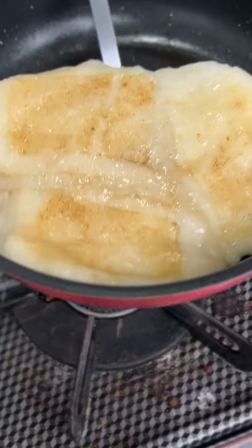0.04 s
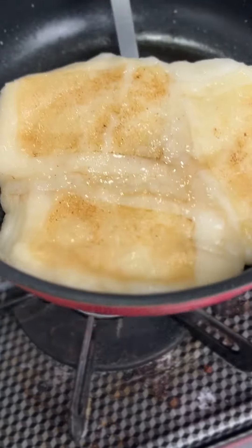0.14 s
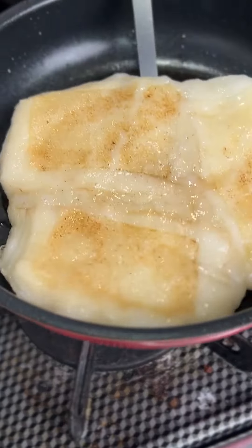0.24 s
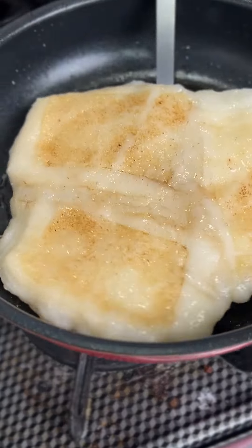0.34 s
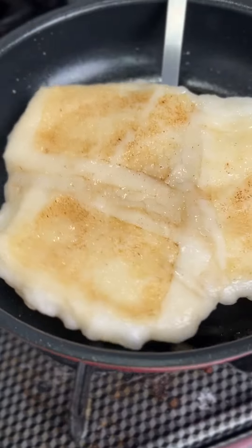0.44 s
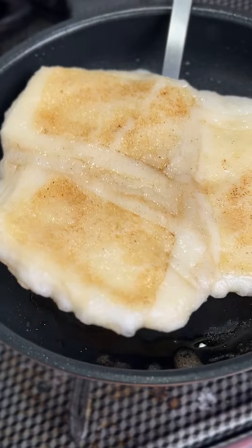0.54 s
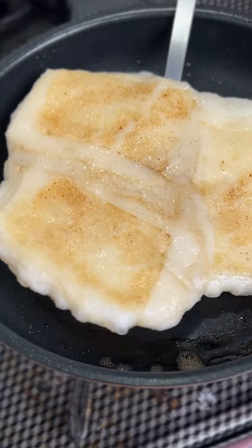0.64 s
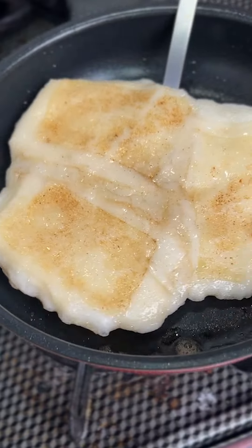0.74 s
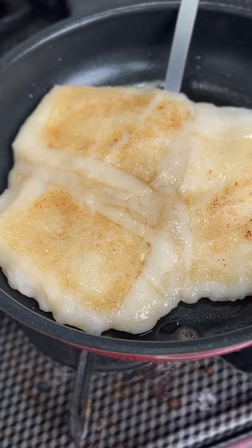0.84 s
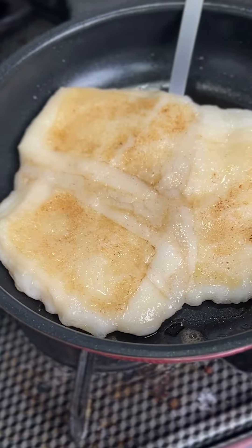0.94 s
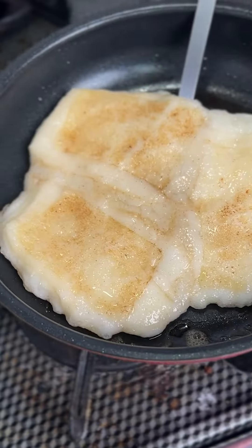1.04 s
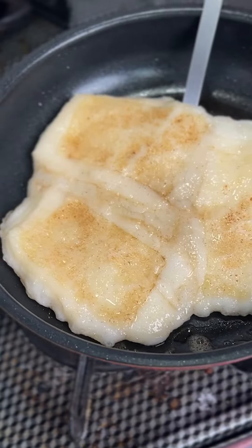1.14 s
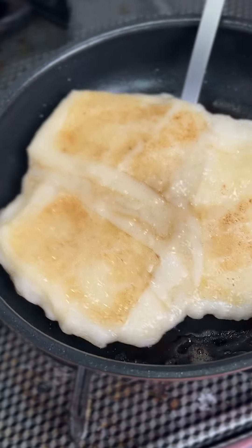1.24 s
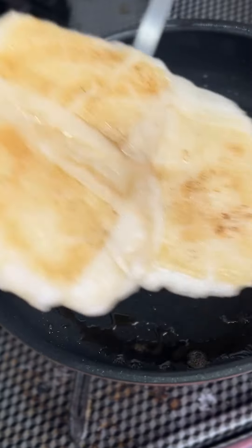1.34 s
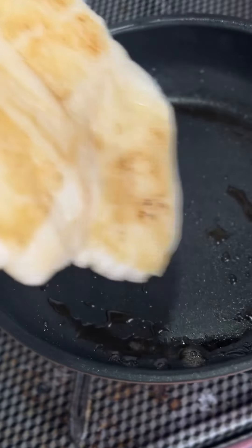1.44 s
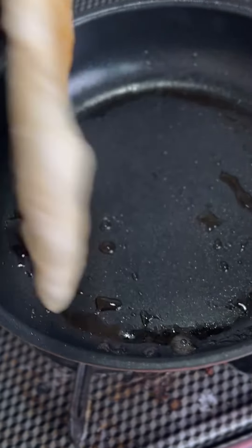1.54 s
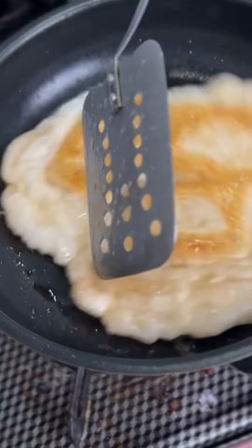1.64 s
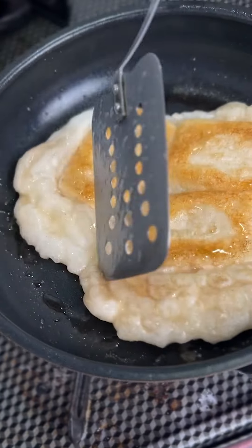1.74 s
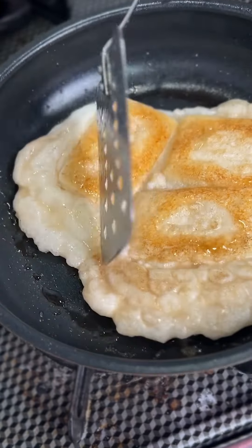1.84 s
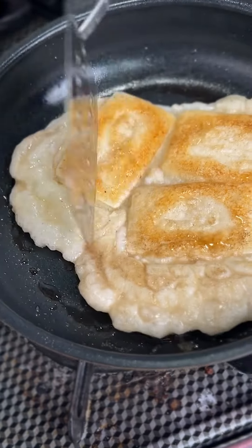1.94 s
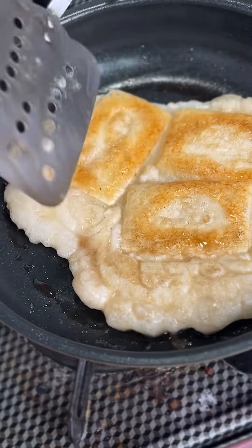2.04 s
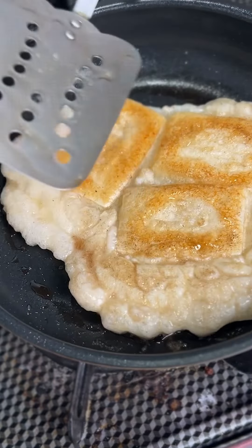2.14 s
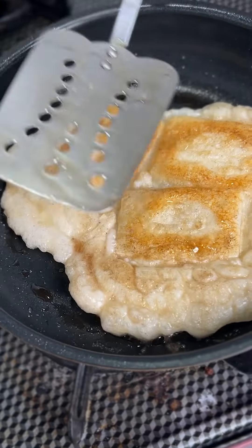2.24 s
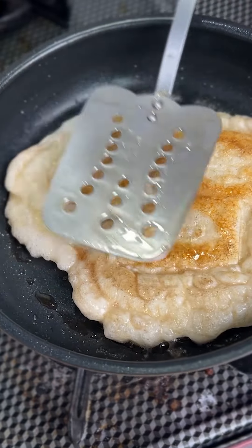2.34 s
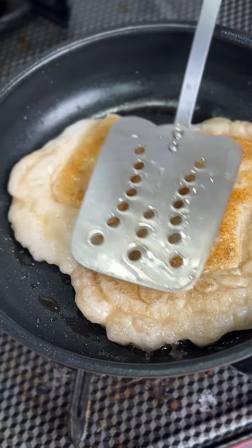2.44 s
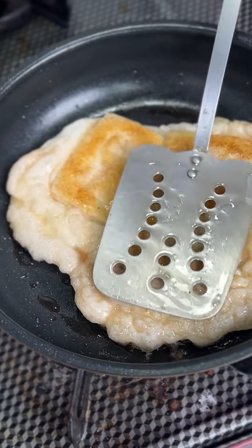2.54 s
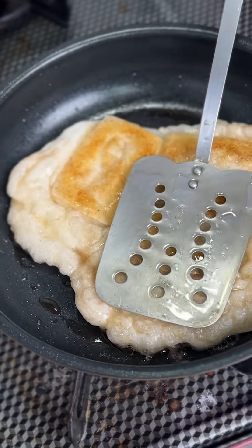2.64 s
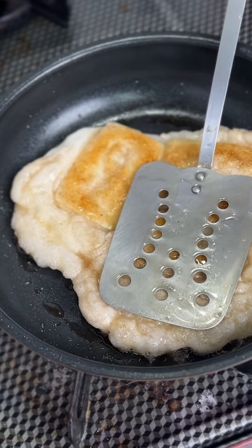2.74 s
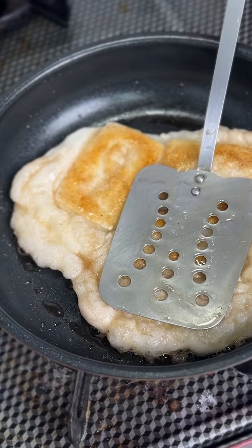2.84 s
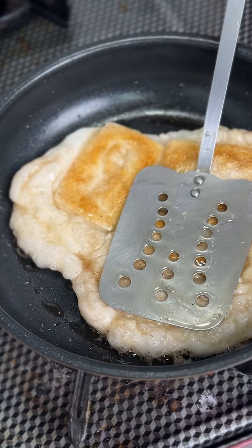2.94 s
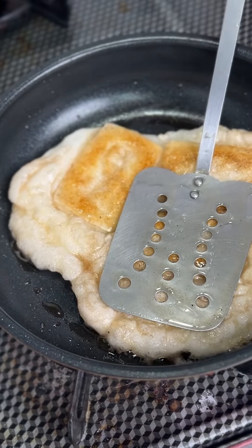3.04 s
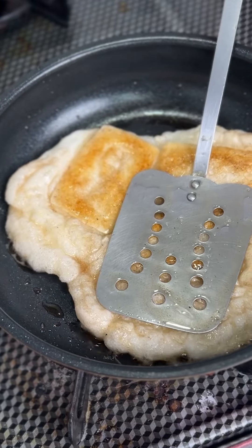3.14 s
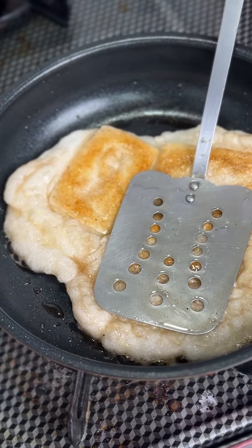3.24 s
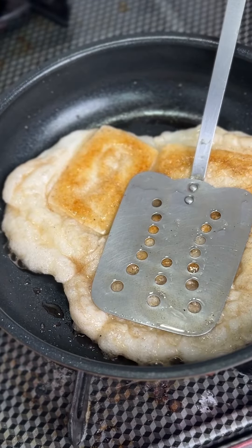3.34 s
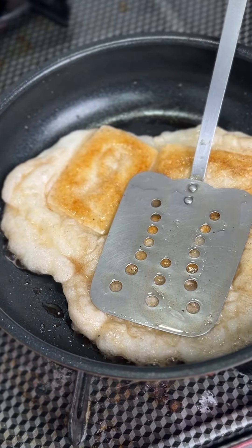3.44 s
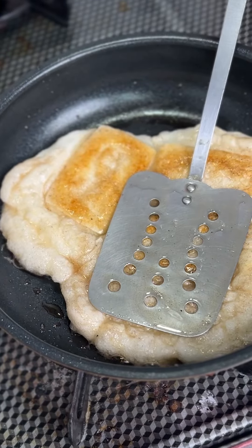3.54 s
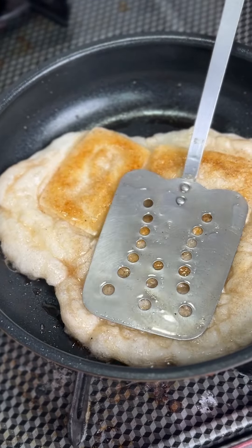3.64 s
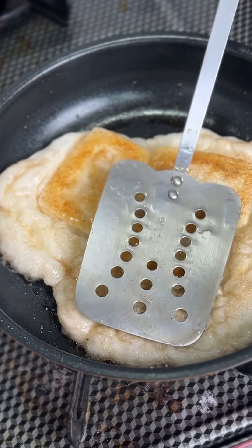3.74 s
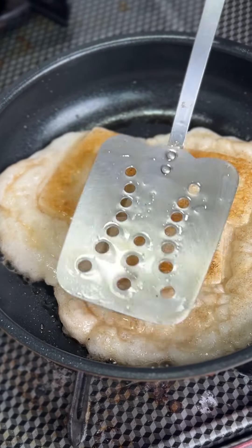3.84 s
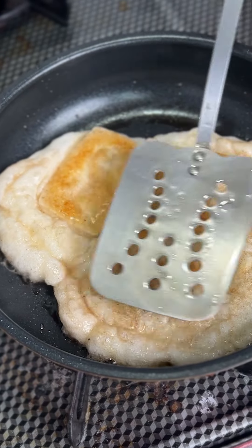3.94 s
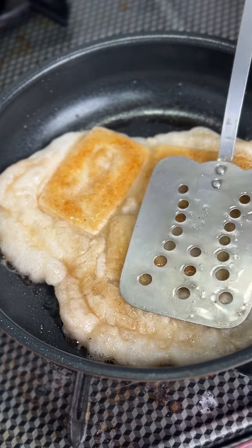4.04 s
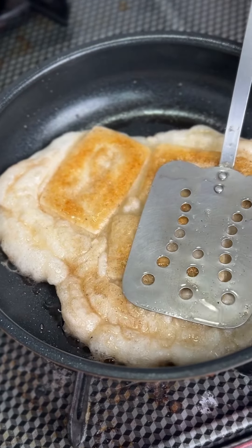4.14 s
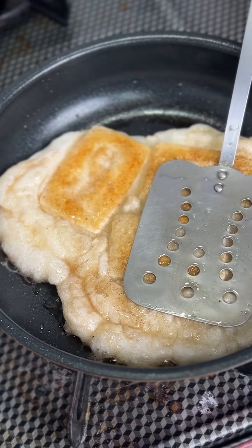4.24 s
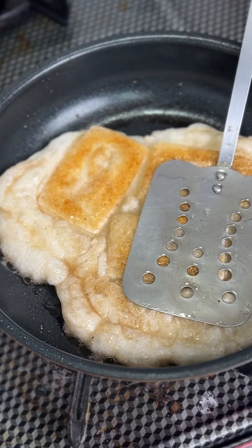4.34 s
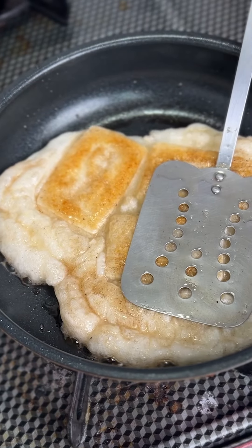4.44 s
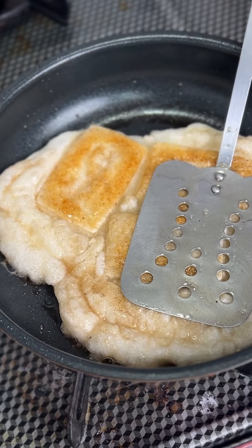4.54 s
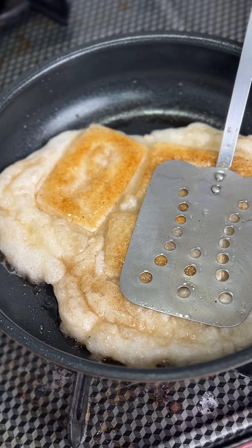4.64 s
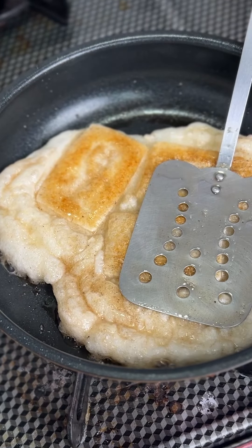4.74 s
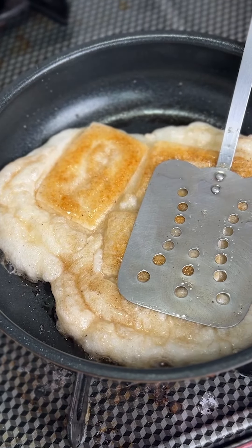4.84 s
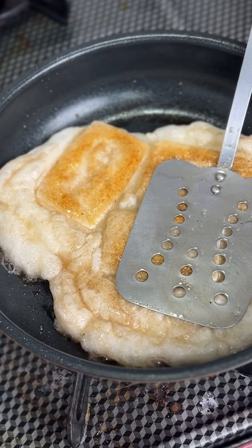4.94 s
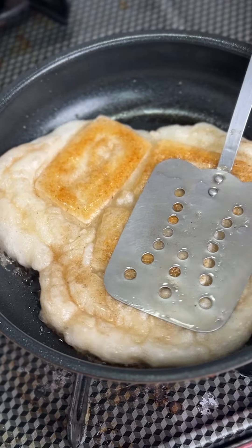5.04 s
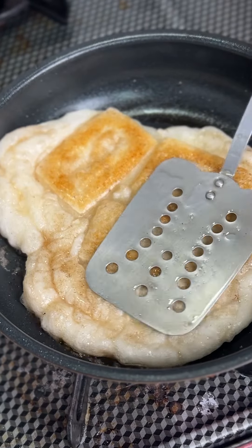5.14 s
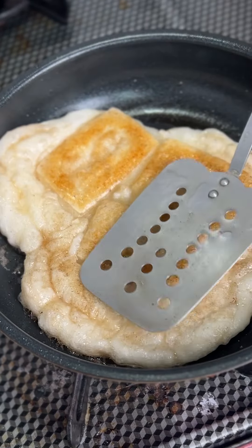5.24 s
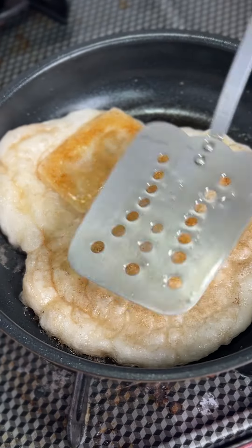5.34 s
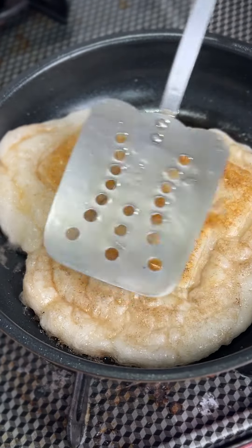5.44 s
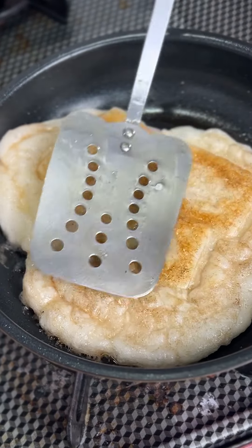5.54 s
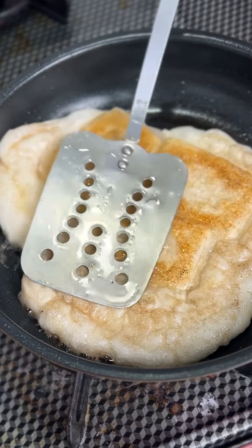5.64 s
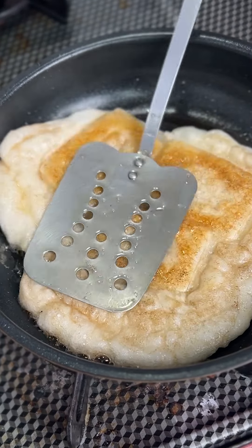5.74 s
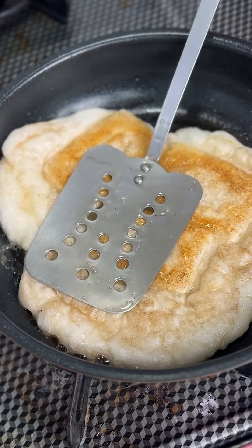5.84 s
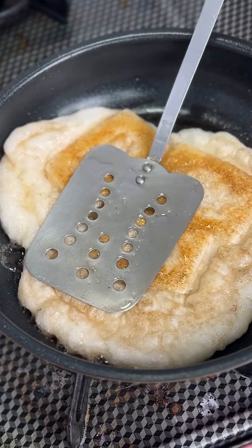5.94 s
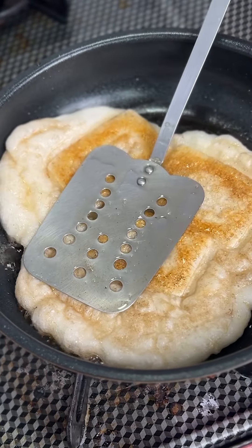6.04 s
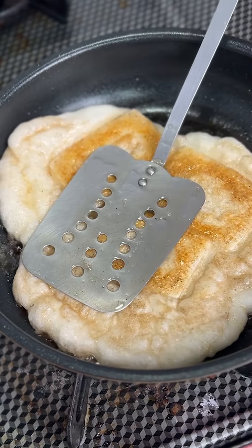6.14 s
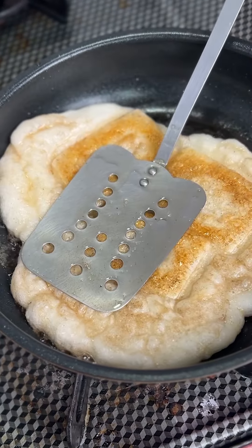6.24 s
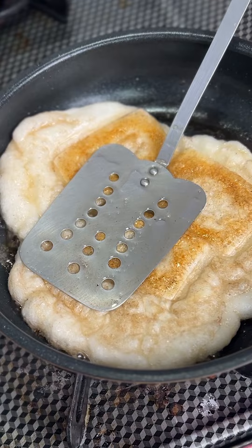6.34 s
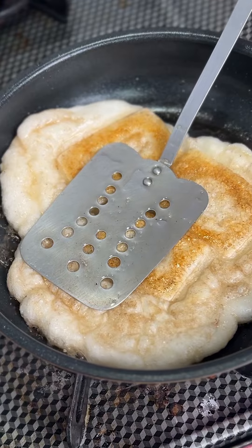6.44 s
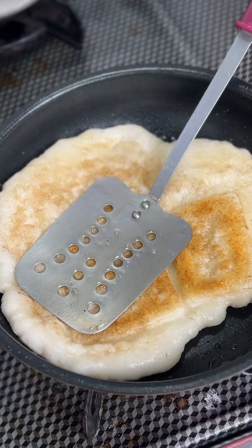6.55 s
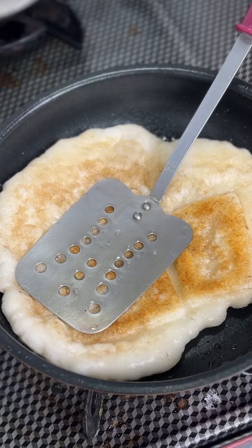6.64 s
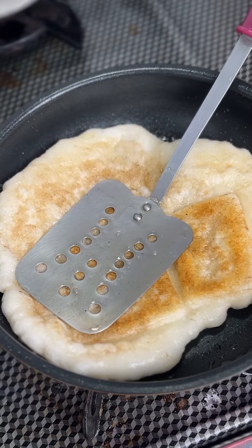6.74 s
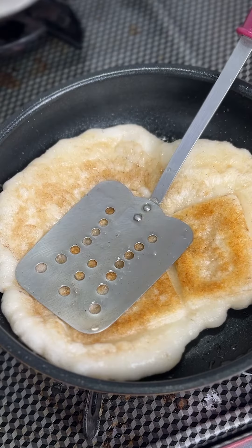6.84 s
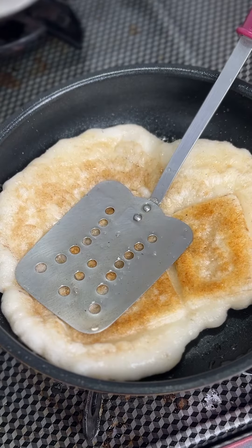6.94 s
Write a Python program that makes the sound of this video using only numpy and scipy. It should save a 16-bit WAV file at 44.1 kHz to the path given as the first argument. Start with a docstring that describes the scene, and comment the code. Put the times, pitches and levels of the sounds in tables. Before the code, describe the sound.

A metal spatula scrapes a pan, rice cakes flip over with a wet knock, then butter sizzles and snaps as the blade pats and presses.

```python
"""Rice cakes fry in butter in a nonstick pan on a gas ring, close to a phone in a small kitchen.
First the browned side fries nearly dry (sparse clicks through filters) and a slotted steel spatula scrapes (slips
ring blade modes). At 1.69 s the cakes land on their fresh side with a knock (noise and pan modes); the sizzle jumps.
From 2.2 s the blade pats and presses: fizz swells, butter, dough and blade taps snap (noise cracks, short rings).
Squeaks (gliding sines) come throughout, over the steady gas ring (filtered noise)."""
import sys
import numpy as np
from scipy import signal
from scipy.fft import rfft, irfft
from scipy.io import wavfile

SR = 44100
rng = np.random.default_rng(int(sys.argv[2]) if len(sys.argv) > 2 else 0)


def unload_wav(signal):
    """Save mono or channel-first audio to the path in sys.argv[1] as 16-bit WAV at rate SR, clipped to [-1, 1]."""
    wavfile.write(
        sys.argv[1],
        SR,
        np.round(np.clip(np.atleast_2d(signal).T, -1, 1) * 32767).astype(np.int16),
    )


N = 308700


def amp(db):
    """Decibels to gain."""
    return 10 ** (np.asarray(db) / 20)


def unit(x):
    """Scale to rms 1."""
    return x / np.sqrt(np.mean(x ** 2))


def add(track, s, sound):
    """Mix a sound in at time s, or at 0 if s is negative."""
    start = max(int(s * SR), 0)
    track[start:start + len(sound)] += sound[:N - start]


def through(x, response):
    """Pass a sound through an impulse response."""
    return signal.oaconvolve(x, response)[:len(x)]


def colour(x, points, size=2048):
    """Minimum-phase filter that follows (frequency [Hz], gain [dB]) points."""
    hz, db = np.transpose(points)
    bin_hz = np.fft.rfftfreq(size, 1 / SR)
    log_gain = np.log(amp(np.interp(np.log(bin_hz + 1), np.log(hz), db)))
    cepstrum = irfft(log_gain)[:size // 2]
    cepstrum[1:] *= 2  # fold to causal
    return through(x, irfft(np.exp(rfft(cepstrum, size))))


def ring(modes, size=8192):
    """Impulse response of a body's resonances, with energy 1."""
    t = np.arange(size) / SR
    y = np.zeros(size)
    for hz, width_hz, db in modes:
        decay = np.exp(-np.pi * width_hz * t)
        y += amp(db) * width_hz * decay * np.sin(2 * np.pi * hz * t)
    return y / np.linalg.norm(y)


def burst(seconds, size=4096):
    """Short noise with a nearly even spectrum and energy 1, then silence."""
    window = signal.windows.tukey(max(int(seconds * SR), 8), .25)
    spectrum = rfft(rng.standard_normal(len(window)) * window)
    y = irfft(spectrum / abs(spectrum), len(window)) * window
    return np.pad(y / np.linalg.norm(y), (0, size - len(y)))


def grains(per_second, spread_db):
    """Random clicks of either sign, levels spread exponentially in dB, scaled to rms 1."""
    size = amp(spread_db * np.minimum(rng.exponential(size=N), 5.3))
    hits = rng.random(N) < per_second / SR
    return unit(hits * size * rng.choice([-1, 1], N))


def waver(per_second, depth_db):
    """Gain that wanders linearly in dB between random knots."""
    knots = rng.standard_normal(4096)
    return amp(depth_db * np.interp(np.arange(N) / SR * per_second, np.arange(len(knots)), knots))


def swell(s, rise, hold, release_db_per_s, sag_db_per_s=0):
    """Gain of one gesture: rises from time s, sags steadily in dB while held, then dies away."""
    t = np.arange(N) / SR - s - rise
    fall_db = sag_db_per_s * np.clip(t, 0, hold) + release_db_per_s * np.maximum(t - hold, 0)
    return np.clip(1 + t / rise, 0, 1) * amp(-np.minimum(fall_db, 200))


def sides(mid, side):
    """Left and right from their common part and their difference."""
    return mid + side * np.array([[1], [-1]])


def bursting(hz, spread_octaves, per_second, spread_db, cycles, count=10, size=1024):
    """Droplets or bubbles of several sizes burst at random; each rings for a few cycles."""
    t = np.arange(size) / SR
    out = np.zeros(N)
    for octaves in np.linspace(-1, 1, count) * spread_octaves:
        phase = hz * 2 ** octaves * t
        response = np.exp(-phase / cycles) * np.sin(2 * np.pi * phase)
        out += through(grains(per_second, spread_db), response)
    return unit(out)


FLIP_S = 1.69
# undisturbed frying, browned side, then fresh side at the flip: (fizz level [dB], bubbling level [dB])
BROWNED_DB = (-73.5, -66.5)
FRESH_DB = (-54, -59.5)
DRYING_DB_PER_S = 0.59
# blade presses water into the butter: (time [s], rise [s], hold [s], fizz level [dB], bubbling level [dB])
PRESSES = [(2.2, 0.23, .05, -60, -55), (2.752, 0.24, 0.45, -48.5, -51), (4.035, 0.077, 0.56, -52.5, -52),
           (5.35, 0.21, 0.32, -55, -61), (5.694, 0.42, .02, -49.5, -47.5)]
PRESS_SAG_DB_PER_S, PRESS_RELEASE_DB_PER_S = 0.5, 28.5  # water runs out; blade eases off
# wet dough hisses briefly on hot butter: (time [s], hold [s], level [dB])
SPURTS = [(0.228, 0.02378, -60.5), (0.385, 0.0084, -59.5), (1.468, 0.0087, -54.5), (2.934, 0.026, -49),
          (5.161, 0.035, -51.5), (5.732, 0.084, -52.5), (5.893, 0.027, -49)]
SPURT_RISE_S, SPURT_RELEASE_DB_PER_S = 0.0032, 158


def boiling():
    """Gains of fizz, resting and squeezed bubbles: side on the pan, presses and spurts add in power."""
    since_flip_s = np.arange(N) / SR - FLIP_S
    fizz, resting = (amp(np.where(since_flip_s < 0, browned, fresh - DRYING_DB_PER_S * since_flip_s)) ** 2
                     for browned, fresh in zip(BROWNED_DB, FRESH_DB))
    pressed = np.zeros(N)
    for s, rise, hold, fizz_db, bubbling_db in PRESSES:
        force = swell(s, rise, hold, PRESS_RELEASE_DB_PER_S, PRESS_SAG_DB_PER_S)
        fizz = fizz + (amp(fizz_db) * force) ** 2
        pressed = pressed + (amp(bubbling_db) * force) ** 2
    for s, hold, db in SPURTS:
        fizz = fizz + (amp(db) * swell(s, SPURT_RISE_S, hold, SPURT_RELEASE_DB_PER_S)) ** 2
    return np.sqrt([fizz, resting, pressed])


# spectra of open fizz, resting and squeezed bubbles: (frequency [Hz], relative density [dB])
FIZZ = [(1000, -18), (3300, -8), (5000, -3.5), (7200, 0.5), (9500, 3), (13500, 2.5), (16000, -8)]
BUBBLING = [(200, -15.5), (440, 3.5), (900, -3.5), (1750, -3.5), (2600, -1.5), (7000, -23), (16000, -55)]
SQUEEZED = [(200, -12.5), (420, 0.5), (900, -3), (1800, 0.5), (2600, -3.5), (3400, -8.5), (16000, -22.5)]
# centre pitch, spread to either side; dB relative to the fizz (ticks) or squeezed bubbling (plops)
TICK_HZ, TICK_SPREAD_OCTAVES, TICK_DB = 8440, 0.59, -9.5
PLOP_HZ, PLOP_SPREAD_OCTAVES, PLOP_DB = 1780, 0.62, -8


def frying():
    """Fine droplets burst in the open, in flurries; larger bubbles burst muffled, and plop when squeezed."""
    fizz_gain, resting_gain, pressed_gain = boiling()
    flurry = waver(40, depth_db=2.5)
    fizz = unit(colour(grains(per_second=4500, spread_db=3.2), FIZZ))
    ticks = bursting(TICK_HZ, TICK_SPREAD_OCTAVES, per_second=24, spread_db=3.7, cycles=2.5)
    plops = bursting(PLOP_HZ, PLOP_SPREAD_OCTAVES, per_second=12, spread_db=2, cycles=3)
    resting = unit(colour(grains(per_second=1500, spread_db=2.0), BUBBLING)) * waver(35, depth_db=4.5)
    squeezed = unit(colour(grains(per_second=2000, spread_db=2.04), SQUEEZED))
    open_butter = (fizz + amp(TICK_DB) * ticks * flurry) * fizz_gain
    under_blade = (squeezed + amp(PLOP_DB) * plops * flurry) * pressed_gain
    return open_butter + resting * resting_gain + under_blade


# sharp snaps of butter, wet dough and the blade's taps:
# (time [s], relative ring level [dB], ring [Hz], relative crack level [dB], crack [Hz])
SNAPS = [(0.411, -38, 2740, -25.5, 5110), (2.463, -12, 2100, -2.5, 4360), (2.5635, -23.5, 2060, -23, 3500),
         (2.7187, -20, 1800, -8, 5200), (2.73, -21, 1916, -22.5, 4170), (2.7401, -43, 2540, -7, 4400),
         (2.8148, -18, 1616, -3, 5800), (2.872, -23, 1410, -8, 5960), (2.878, -17, 1750, 0, 7050),
         (2.9048, -18.5, 1570, -7.5, 6950), (2.946, -21, 1333, -10.5, 6870),
         (3.6322, -24.5, 1800, -13, 9200), (4.009, -30, 1200, -17.5, 3360), (4.1205, -23, 1460, -9, 7100),
         (4.133, -15.5, 1520, -2, 6900), (4.6329, -20.5, 1780, -11, 11000), (5.727, -27, 1450, -16, 4260),
         (6.159, -19, 1740, 1, 12600), (6.278, -21.5, 1590, -10.5, 4200)]
# droplets on bare metal, no ring: (time [s], relative level [dB])
DROPLETS = [(0.073, -13), (1.0916, -25), (2.341, -22.5), (2.9684, -8.5), (2.999, -13), (3.0134, -14),
            (3.148, -12), (3.2345, -13), (3.408, -16), (3.4387, -20), (4.216, -12), (4.347, -15.5),
            (6.9542, -19.5)]
# droplet spectrum: (frequency [Hz], gain [dB])
DROPLET = [(2000, -21), (7200, 5), (13000, -3), (16000, -1)]


def snaps(ring_s=0.00047, crack_s=0.0022, droplet_s=0.00023, spray_s=0.0084, size=4096):
    """Butter, wet dough or a blade tap cracks, sprays and rings briefly; a droplet only cracks."""
    out, t = np.zeros(N), np.arange(size) / SR
    for s, ring_db, hz, crack_db, crack_hz in SNAPS:
        short_ring = t / ring_s * np.exp(-t / ring_s) * np.sin(2 * np.pi * hz * t)
        noise = burst(crack_s) + amp(-7.5) * burst(spray_s)
        crack = colour(noise, [(600, -22), (crack_hz / 2, -3), (crack_hz, 0), (crack_hz * 2, -12)])
        add(out, s, amp(ring_db) * short_ring + amp(crack_db) * crack)
    for s, db in DROPLETS:
        add(out, s, amp(db) * colour(burst(droplet_s), DROPLET))
    return out


# strokes of the blade:
# (time [s], hold [s], relative level [dB], lowest excited frequency [Hz], loaded blade pitch [ratio])
STROKES = [(-.005, 0.098, -37, 690, 0.99), (0.14, 0.16, -56, 747, 0.92), (0.688, 0.0088, -53, 7950, 1.1),
           (0.828, 0.043, -54.5, 3600, 0.9), (1.41, 0.15, -56, 795, 1.06),
           (2.673, 0.02957, -50.5, 2300, 1.2), (2.715, 0.041, -41.5, 1900, 1.078),
           (4.987, 0.032, -44.5, 4020, 1.3), (5.625, 0.0056, -48, 1200, 1.3),
           (6.633, 0.041, -49, 5700, 1.65)]
STROKE_RISE_S, STROKE_SAG_DB_PER_S, STROKE_RELEASE_DB_PER_S = 0.0023, 37, 354
# blade resonances: (frequency [Hz], width [Hz], relative level [dB])
BLADE = [(1080, 77, -8.5), (1567, 124, 4), (1807, 180, 5), (2428, 70, 5.5), (2970, 57, -4),
         (4040, 63, -5.5), (10000, 450, -11.5)]
FLEX = 0.02  # largest share by which blade pitch wanders
# edge noise spectrum: (frequency [Hz], relative gain [dB])
RASP = [(300, -34), (780, -1), (1200, -10.5), (2100, 1), (2700, 0.5), (3400, -5), (9800, -11),
        (16000, -21.5)]


def scraping(size=32768):
    """The steel edge sticks and slips; each slip rings the blade, whose pitch shifts as it bends and flexes."""
    chatter = grains(per_second=3000, spread_db=1) * waver(250, depth_db=2.5)
    flex = np.tanh(np.log(waver(40, depth_db=9)))
    out = np.zeros(N)
    for s, hold, db, edge_hz, bend in STROKES:
        now = slice(max(int(s * SR), 0), int(s * SR) + size)
        force = amp(db) * swell(s, STROKE_RISE_S, hold, STROKE_RELEASE_DB_PER_S, STROKE_SAG_DB_PER_S)
        slips = colour((chatter * force)[now], [(edge_hz / 2, -22), (edge_hz, 0)])
        add(out, s, amp(6.5) * colour(slips, RASP))
        for way in (-1, 0, 1):  # crossfade flat, neutral and sharp blades
            blade = ring([(hz * bend * (1 + way * FLEX), width, mode_db) for hz, width, mode_db in BLADE])
            share = np.maximum(1 - abs(flex[now] - way), 0)
            add(out, s, through(slips * share, blade))
    return out


# blows of the cakes on the pan: (time [s], relative level [dB], contact [s], treble [dB])
KNOCKS = [(1.354, -41.5, 0.01, -2.5), (1.442, -39, 0.0069, -3.5), (1.641, -32, 0.0043, -1.5),
          (1.677, -35, 0.0071, -4), (1.6858, -12.5, 0.0094545, -5), (5.792, -45.5, 0.0066, 6.5)]
# wet slap spectrum, also for pats and slides: (frequency [Hz], relative gain [dB])
SLAP = [(100, -25.5), (430, -3.5), (620, -9), (1350, -5), (2000, -7.5), (3200, -11), (9000, -8.5),
        (16000, -15)]
# loaded pan resonances: (frequency [Hz], width [Hz], relative level [dB])
PAN = [(526, 35, 1), (774, 17, -23), (1068, 150, 3), (1208, 54, 7), (1464, 99, 12), (1860, 84, 7.5),
       (2870, 59, 2.5)]


def knocks():
    """A soft, wet contact of a few milliseconds slaps, and its push rings the loaded pan."""
    slaps, pushes = np.zeros(N), np.zeros(N)
    for s, db, contact_s, treble_db in KNOCKS:
        softness = [(650, 0), (2500, treble_db)]
        add(slaps, s, amp(db) * colour(burst(contact_s), softness))
        add(pushes, s + contact_s * .25, amp(db) * colour(signal.unit_impulse(512), softness))
    return amp(32.0) * colour(slaps, SLAP) + amp(22) * through(pushes, ring(PAN))


# blade pats the cakes and bounces: (time [s], relative level [dB], treble [dB])
PATS = [(2.4645, -13, 10), (2.476, -15, 1), (2.527, -19, -5), (2.537, -20.5, -25), (2.564, -15.5, -13),
        (2.576, -18, -7), (3.794, -13.5, -22), (5.085, -20.5, -8)]
# blade, cake and pan in contact: (frequency [Hz], width [Hz], relative level [dB])
PATTED = [(550, 27, 1.5), (753, 86, -2.5), (1230, 190, 1)]
PAT_CONTACT_S, PAT_SLAP_DB = 0.00275, 7.5


def pats():
    """The flat blade meets the soft cake: a short push rings hollow, with a wet slap."""
    pushes = np.zeros(N)
    for s, db, treble_db in PATS:
        add(pushes, s, amp(db) * colour(burst(PAT_CONTACT_S), [(650, 0), (2500, treble_db)]))
    return through(pushes, ring(PATTED)) + amp(PAT_SLAP_DB) * colour(pushes, SLAP)


# wet dough slides on the pan: (time [s], hold [s], level [dB])
SLIDES = [(1.546, 0.06, -43), (1.621, 0.0045, -38), (1.669, 0.012, -39.5), (4.269, 0.011, -43),
          (4.326, 0.011, -48)]
SLIDE_RISE_S, SLIDE_RELEASE_DB_PER_S = 0.007, 475


def sliding():
    """Wet dough drags through hot butter: a dense run of tiny slaps."""
    drag = sum(amp(db) * swell(s, SLIDE_RISE_S, hold, SLIDE_RELEASE_DB_PER_S) for s, hold, db in SLIDES)
    return unit(colour(grains(per_second=4000, spread_db=-1.5), SLAP)) * drag


# steam and blade on wet dough: (time [s], length [s], pitch [Hz], glide [octaves], mean peak level [dB])
SQUEAKS = [(0, 0.015, 2640, -0.021, -35.5), (0.056, 0.046, 2425, -0.11, -50),
           (0.105, 0.06, 746, -0.056, -49), (1.477, 0.072, 840, -0.24, -48),
           (1.611, 0.03, 4100, 0.012, -45), (2.613, 0.049, 608, 0.214, -50.5),
           (3.995, 0.083, 875, -0.035, -52), (5.509, 0.034, 772, -0.052, -54),
           (5.62, 0.03, 4360, -0.036, -48.5), (5.809, .028, 1530, -0.88, -49.5),
           (5.861, 0.019, 745.5, -0.15, -50.5), (6.556, 0.034, 671, -0.06, -47)]


def squeaks():
    """Soft dough flutters against steam or steel; unsteady contact makes the pitch wobble and slide."""
    out = np.zeros(N)
    wobble_hz = 45 * np.log(waver(500, depth_db=9))
    flutter = waver(260, depth_db=3.5)
    for s, length_s, hz, glide, db in SQUEAKS:
        now = np.arange(int(s * SR), int((s + length_s) * SR))
        progress = np.linspace(0, 1, len(now))
        phase = np.cumsum(hz * 2 ** (glide * progress) + wobble_hz[now]) / SR
        envelope = amp(db) * signal.windows.tukey(len(now), .5) * flutter[now]
        add(out, s, envelope * np.sin(2 * np.pi * phase))
    return out


def reflections(x, near_t60=0.065, far_t60=0.21, near_db=-9, far_db=-16, size=16384):
    """Quick reflections from pan wall and hob, then the faint room tail; both come back a little duller."""
    t = np.arange(size) / SR
    near, far = (rng.standard_normal(size) * amp(-60 * t / t60) * (t > .001) for t60 in (near_t60, far_t60))
    response = amp(near_db) * near / np.linalg.norm(near) + amp(far_db) * far / np.linalg.norm(far)
    return through(x, colour(response, [(3000, 1), (8000, -0.59)]))


# left-right difference of the reflections: (frequency [Hz], relative gain [dB])
WIDTH = [(450, -5.5), (900, 3), (2100, -16.5), (3500, 4), (4800, -6), (6500, 2)]


def kitchen(x, count=2):
    """The source wanders between spots of the pan, each with its own reflections; direct sound is central."""
    spots = np.log([waver(12, depth_db=1) for _ in range(count)])
    spots = spots / np.linalg.norm(spots, axis=0)  # constant total power
    mid, side = (sum(reflections(x * share) for share in spots) for _ in range(2))
    return sides(x + mid, amp(2.0) * colour(side, WIDTH))


# gas ring and kitchen spectrum: (frequency [Hz], relative density [dB])
BURNER = [(40, -22), (110, -17), (300, -24.5), (420, -1.5), (800, 6.5), (1300, -2), (3000, -11.5),
          (9000, -13), (15000, -39)]
BURNER_DB = -61


def burner():
    """Steady rush of the gas ring and the kitchen: wavering noise, partly different on each side."""
    mid, side = (unit(colour(rng.standard_normal(N) * waver(13, depth_db=2.5), BURNER)) for _ in range(2))
    return amp(BURNER_DB) * sides(mid, amp(-4.0) * side)


# the phone's microphone cuts the bass steeply below about 400 Hz, here on the pan: (frequency [Hz], gain [dB])
MIC_BASS_CUT = [(60, -26), (220, -23), (330, -33), (405, 0)]


def scene():
    """Everything in the pan, heard in the kitchen over the gas ring."""
    pan = frying() + snaps() + scraping() + knocks() + pats() + sliding() + squeaks()
    return kitchen(colour(pan, MIC_BASS_CUT)) + burner()


def record(dry):
    """The phone's left port lags in the treble; the phone cuts the top."""
    lag_rad = np.interp(np.fft.rfftfreq(N, 1 / SR), [5500, 7200], [0, 1.3])
    ports = irfft(rfft(dry) * np.exp(.5j * lag_rad * np.array([[-1], [1]])), N)
    return signal.sosfilt(signal.ellip(10, .2, 70, 15800, fs=SR, output="sos"), ports)


dry = scene()
out = record(dry)
unload_wav(out)
```